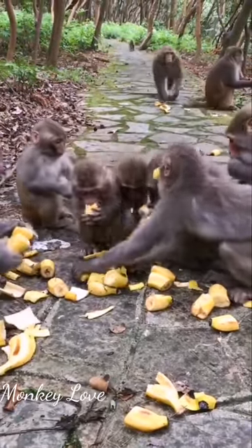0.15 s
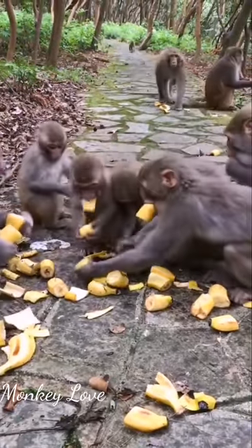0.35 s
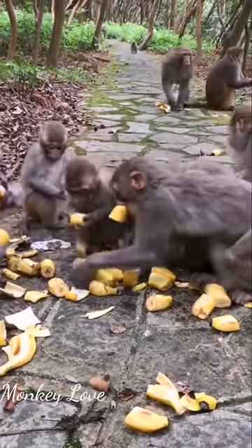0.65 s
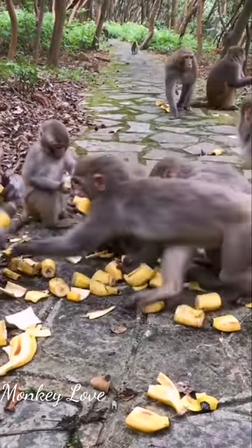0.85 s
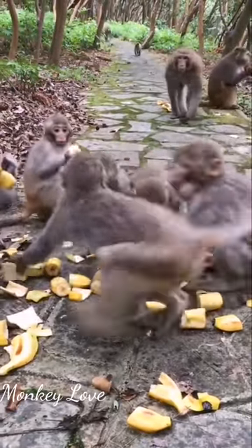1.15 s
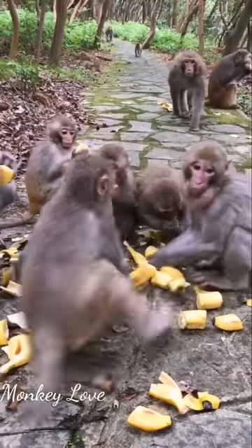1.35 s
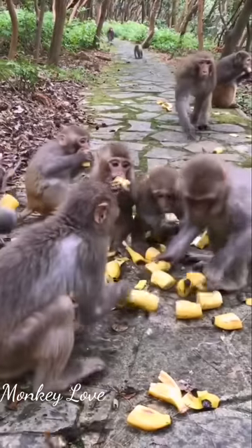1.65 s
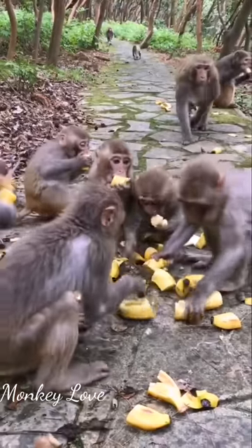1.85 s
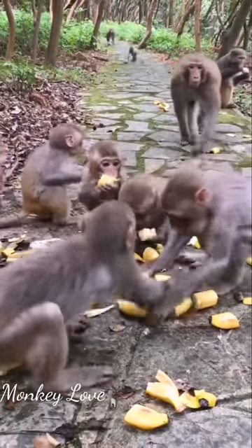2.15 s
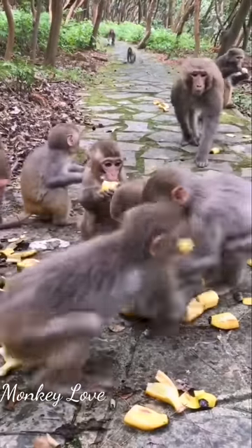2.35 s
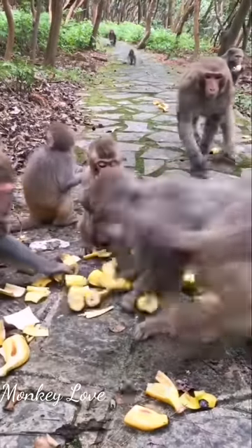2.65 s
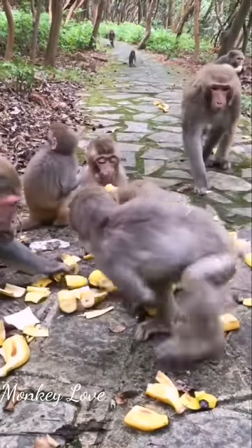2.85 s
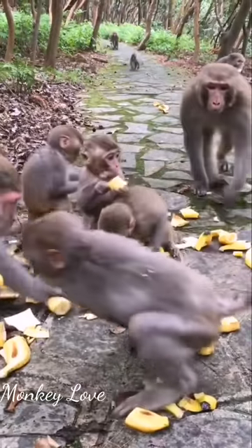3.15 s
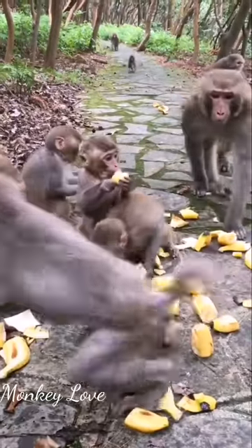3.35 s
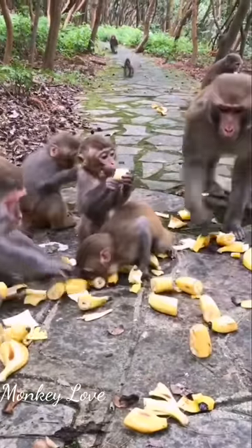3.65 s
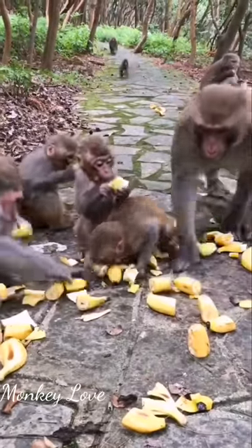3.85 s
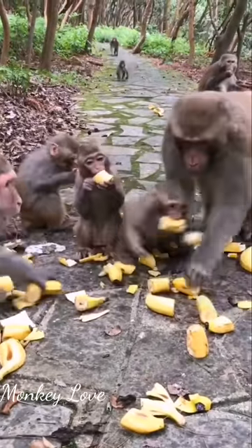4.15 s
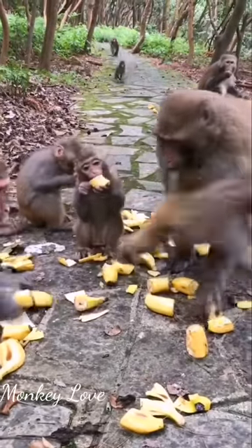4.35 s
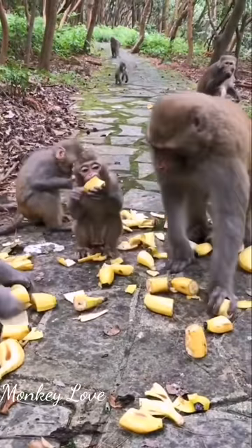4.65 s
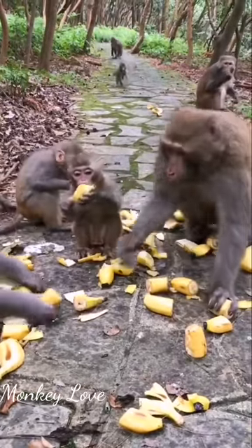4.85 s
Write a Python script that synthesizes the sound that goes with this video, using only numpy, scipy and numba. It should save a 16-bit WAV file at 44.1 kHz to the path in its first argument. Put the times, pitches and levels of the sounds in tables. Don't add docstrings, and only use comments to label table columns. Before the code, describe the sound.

Close scuffs, clicks and leafy rustle from feeding monkeys, broken by very short squeals and barks, over soft low forest rumble and distant idling.

```python
import sys
import numpy as np
from scipy import signal
from scipy.fft import rfft, irfft, next_fast_len
from scipy.io import wavfile
from scipy.ndimage import uniform_filter1d
from numba import njit

SR = 44100
rng = np.random.default_rng(int(sys.argv[2]) if len(sys.argv) > 2 else 0)


def voltage_ratio(level):
    return 10 ** (np.asarray(level, float) / 20)


def persist_wave(psi):
    counts = np.round(np.clip(psi, -1, 1) * 32767).astype(np.int16)
    wavfile.write(sys.argv[1], SR, np.atleast_2d(counts).T)


N = 221173

RASP_SHAPE = 0.24, .45, 9.8, 15


@njit
def svf(x, hz, width):
    y, b, l = np.empty(len(x)), 0., 0.
    for i in range(len(x)):
        g, k = np.tan(np.pi * hz[i] / SR), width / hz[i]
        v = (b + g * (x[i] - l)) / (1 + g * (g + k))
        b, l, y[i] = 2 * v - b, l + 2 * g * v, k * v
    return y


def band(x, hz, width):
    return svf(x, np.clip(hz + np.zeros(len(x)), 20, .44 * SR), 1. * width)


def band_twice(x, hz, width):
    return band(band(x, hz, width), hz, width)


def unit(x):
    return x / np.sqrt(np.mean(x ** 2))


def walk(rate, size=N):
    k = max(int(SR / rate), 1)
    steps = np.repeat(rng.standard_normal(size // k + 1), k)
    return 1.3 * uniform_filter1d(uniform_filter1d(steps, k), k)[:size]


def read(table):
    s, *columns = np.transpose(table)
    s = np.sort(s)
    at = np.arange(int(max(s[0], 0) * SR), min(int(s[-1] * SR), N))
    edges = np.clip(np.minimum(at - at[0], at[-1] - at) / (SR / 500), 0, 1)
    return at[0], [np.interp(at / SR, s, c) for c in columns], edges


def add(out, at, x):
    x = x[:len(out) - at]
    out[at:at + len(x)] += x


def call_shape(start, length, db, attack, hold, attack_db, release_db):
    share = np.clip([0, attack, attack + hold, 1], 0, 1)
    return start + min(length, .225) * share, share, db - np.array([attack_db, 0, 0, release_db])


def monkeys():
    out = np.zeros(N)
    for voice, calls in ((whistle, thin_calls()), (bark, harsh_calls())):
        for call in calls:
            at, curves, edges = read(call)
            add(out, at, edges * voice(*curves))
    add(out, *screech())
    add_wheezes(out)
    add(out, *coo())
    return out


def bark(hz, db, throat_hz, mouth_hz, hiss_db, muzzle_db):
    # (centre [Hz], width [Hz], level [dB])
    nasal = [(4500, 900, -8), (2100, 700, -6), (5800, 1400, -13), (7800, 1200, -15)]
    chance = rng.standard_normal((3, 4500))[:, :len(hz)]
    phase = np.cumsum(hz * np.exp(0.2 * walk(700, size=4500)[:len(hz)])) / SR
    slaps = np.diff(np.floor(phase), prepend=np.floor(phase[0])) * voltage_ratio(2 * chance[0])
    puffs = np.exp(-(phase % 1) / 0.51) * chance[1]
    source = unit(slaps) + .6 * unit(puffs)
    cavities = [(f, 420 + .08 * np.median(f), g) for f, g in ((throat_hz, 0), (mouth_hz, -1))]
    for f, width, g in nasal:
        silenced_db = 60 * np.log10(np.minimum(f / throat_hz, 1))
        cavities.append((f, width, g + muzzle_db * (f > 5000) + silenced_db))
    voice = sum((-1) ** k * voltage_ratio(g) * band_twice(source, f, w) for k, (f, w, g) in enumerate(cavities))
    low_cut = signal.butter(2, .5 * np.median(throat_hz), "high", fs=SR, output="sos")
    voice = signal.sosfilt(low_cut, voice)
    hiss = band_twice(puffs + .5 * chance[2], 10300, 14000)
    return voltage_ratio(db) * (unit(voice) + voltage_ratio(hiss_db) * unit(hiss))


def harsh_calls():
    # (time [s], fold slaps [Hz], level [dB], throat [Hz])
    shriek = [(.865, 898, -45, 2500), (.871, 794.5, -19.5, 2200), (.877, 1053, -19, 2300),
              (.886, 903, -24, 2300), (.895, 1001, -21, 3100), (0.903, 996, -25, 2900),
              (.918, 970, -44, 2400), (0.946, 897, -52, 2360)]
    # (time [s], fold slaps [Hz], level [dB], throat [Hz])
    long_bark = [(3.002, 700.3, -49, 1110), (3.01, 599, -30.5, 1030), (3.028, 499.3, -27.5, 1360),
                 (3.04, 480, -35.5, 1270), (3.055, 480, -47.5, 1000), (3.068, 483, -55, 1000)]
    low_bark = [(3.708, 1091, -49, 1500), (3.72, 1120, -32.5, 1250), (3.726, 900, -27.5, 1180),
                (3.74, 573, -31, 1060), (3.753, 560, -56, 1100)]
    falling_bark = [(4.285, 430, -40, 5600), (4.286, 410, -32, 5500), (4.292, 425, -33, 5200),
                    (4.305, 498.5, -27.5, 5116), (4.314, 602, -33.5, 4580), (4.329, 583, -37, 2520),
                    (4.358, 596, -56, 1800)]
    # (mouth above throat [Hz], air hiss at full voice [dB], upper muzzle [dB])
    mouths = [
        (1800, -34, 2),
        (1740, -17, -9),
        (1600, -24, -7),
        (1800, -18, -5),
    ]
    # (start [s], length [s], throat [Hz], fold slaps [Hz], level [dB])
    rasps = [(.886, 0.036, 9340, 940, -34), (0.972, 0.09, 6400, 900, -43), (2.27, 0.023, 8200, 470, -40),
             (2.995, .065, 7600, 600, -40), (2.985, .036, 9000, 1200, -37), (2.984, .03, 2400, 700, -36),
             (2.99, .04, 3200, 700, -36), (.922, .048, 5600, 900, -41), (1.0, .065, 11800, 790, -45),
             (3.758, .026, 1170, 686, -42)]
    barks = (shriek, long_bark, low_bark, falling_bark)
    calls = [(np.transpose(c), *m) for c, m in zip(barks, mouths)]
    for start, length, throat_hz, hz, db in rasps:
        s, _, level_db = call_shape(start, length, db, *RASP_SHAPE)
        curves = s, hz + 0 * s, level_db, throat_hz + 0 * s
        hiss_db = -5 + 8 * np.log2(throat_hz / 7000)
        calls.append((curves, 1700, hiss_db, -4))
    for (s, hz, db, throat_hz), above_hz, hiss_db, muzzle_db in calls:
        leak_db = .57 * (db.max() - db)
        yield np.transpose([s, hz, db, throat_hz, throat_hz + above_hz, hiss_db + leak_db,
                            muzzle_db + 0 * s])


def whistle(hz, db, octave_db, rough):
    pitch_shake, size_shake = (walk(r, size=10000)[:len(hz)] for r in (1500, 800))
    smooth_hz = uniform_filter1d(hz, 130, mode="nearest")
    phase = 2 * np.pi * np.cumsum(smooth_hz * (1 + .1 * rough * pitch_shake)) / SR
    tone = np.sin(phase) + voltage_ratio(octave_db) * np.sin(2 * phase)
    tone = tone + voltage_ratio(np.minimum(octave_db, 0) - 18) * np.sin(3 * phase)
    air = band(rng.standard_normal(10000)[:len(hz)], 1.2 * hz, 2500)
    shaken = voltage_ratio(11 * rough * np.clip(size_shake, -3, 1)) * tone
    return np.sqrt(2) * voltage_ratio(db) * (shaken + .5 * rough * unit(air))


def thin_calls():
    # (start [s], length [s], first pitch [Hz], last pitch [Hz], level [dB])
    squeaks = [(.943, .013, 5550, 6250, -29), (1.026, .013, 5750, 5450, -38),
               (2.296, .014, 2100, 1500, -46), (2.27, .018, 8100, 7850, -38),
               (2.105, .045, 9750, 9650, -44), (2.088, .018, 12500, 12300, -54),
               (2.29, .016, 8000, 8000, -47), (2.156, .014, 6350, 6300, -46),
               (2.122, .024, 7700, 7450, -41), (1.013, .022, 8550, 8700, -44),
               (1.054, .008, 3300, 2500, -46), (3.86, .014, 6750, 6650, -47),
               (.976, 0.017, 8050, 7950, -40), (1.042, .015, 4450, 3450, -32),
               (1.058, 0.012, 2500, 1750, -41), (2.045, .115, 10700, 9400, -52),
               (2.1, 0.038, 8300, 8100, -35.5), (2.105, .04, 6180, 6100, -41),
               (2.142, .014, 6100, 6300, -35), (2.088, .05, 13900, 13400, -54),
               (3.691, .022, 1420, 1700, -44), (3.812, .014, 4400, 4350, -43.5),
               (3.716, .032, 1190, 1110, -43), (3.842, .036, 4540, 4420, -41),
               (3.842, .036, 2270, 2210, -42), (4.313, .007, 3300, 2600, -34),
               (4.313, .015, 2500, 2380, -29), (4.325, 0.008, 1950, 1750, -37)]
    # (start [s], length [s], first [Hz], last [Hz], level [dB])
    shriek_notes = [(.851, .012, 2750, 3100, -27), (.852, .006, 5400, 6100, -30),
                    (.846, .007, 2000, 2700, -38), (.869, .008, 2700, 2500, -29),
                    (.868, .007, 2050, 2050, -27), (.855, .017, 6150, 6350, -18),
                    (.872, .014, 6350, 6000, -21), (.868, .012, 3500, 3950, -19),
                    (.878, .01, 4100, 4000, -22), (.879, .011, 2150, 2200, -21),
                    (.887, .013, 4950, 4950, -15), (.9, .014, 4960, 4900, -25),
                    (.888, .014, 4000, 4200, -21), (.903, .011, 3980, 4050, -25),
                    (.887, .016, 5900, 5800, -20), (.903, .016, 6100, 5780, -21),
                    (.904, .016, 2980, 2950, -30), (.93, .01, 4000, 4100, -40),
                    (.935, .01, 2380, 2380, -41)]
    # (start [s], length [s], first [Hz], last [Hz], level [dB])
    yelps = [
        (4.3075, 0.009, 3580, 3350, -25.5),
        (1.78, .025, 1420, 2350, -45),
        (2.268, 0.023, 4150, 3750, -38),
        (3.87, .018, 2350, 1310, -45),
    ]
    # (start [s], length [s], first [Hz], last [Hz], level [dB])
    chirps = [(.775, 0.019, 6800, 6640, -45.5), (1.032, .014, 4200, 4200, -46),
              (.95, .018, 6800, 6700, -39.5), (2.278, .015, 3900, 3100, -38),
              (2.235, 0.039, 7200, 6700, -50), (2.987, .011, 2400, 2400, -40),
              (3.002, .03, 3050, 2980, -41), (1.046, .014, 5100, 5000, -47), (1.072, .032, 2290, 2250, -51),
              (4.334, .026, 1720, 1600, -48)]
    # (start [s], length [s], first [Hz], last [Hz], level [dB])
    murmur = [
        (.46, .2, 295, 365, -59),
    ]
    # (time [s], pitch [Hz], level [dB])
    warble = [(2.03, 3800, -52), (2.046, 4300, -50), (2.052, 4500, -40), (2.065, 4700, -42),
              (2.104, 4270, -47)]
    # (time [s], pitch [Hz], level [dB])
    warble_end = [(2.104, 4200, -47), (2.112, 3860, -31), (2.145, 3856, -26), (2.153, 4450, -33),
                  (2.164, 4200, -41), (2.172, 4950, -39), (2.194, 6150, -45), (2.22, 6050, -45),
                  (2.233, 5100, -40), (2.248, 4830, -40)]
    kinds = ((squeaks, (-23, 0.2644, 0.37, 0.5, 12, 16.5)), (shriek_notes, (-24, .2, .25, .5, 7, 8)),
             (yelps, (-3.5, 0.31, 0.5, 1, 16, 10)), (chirps, (-15, .7, 0.1, .2, 7, 8)),
             (murmur, (-30, 0, .75, .1, 9, 12)))
    for rows, (octave_db, rough, *manner) in kinds:
        for start, length, first_hz, last_hz, db in rows:
            s, share, level_db = call_shape(start, length, db, *manner)
            hz = first_hz + (last_hz - first_hz) * share
            yield np.transpose([s, hz, level_db, octave_db + 0 * s, rough + 0 * s])
    for phrase in (warble, warble_end):
        s, hz, db = np.transpose(phrase)
        effort_db = db + 30
        yield np.transpose([s, hz, db, -19 - .15 * effort_db, .24 * voltage_ratio(.3 * effort_db)])


def screech():
    # (time [s], pitch [Hz], level [dB])
    course = [
        (.986, 915, -52),
        (.996, 920, -44),
        (1.012, 945, -41),
        (1.028, 966, -39),
        (1.04, 930, -48),
    ]
    # (multiple [-], level [dB])
    overtones = [(6, -3), (6.5, -7), (7, 0), (7.5, -6), (8, -1), (8.5, -8), (9, -3), (12, -12), (13, -10),
                 (14, -12)]
    at, (hz, db), edges = read(course)
    phase = 2 * np.pi * np.cumsum(hz * (1 + .006 * walk(250, size=len(hz)))) / SR
    tones = 0
    for k, g in overtones:
        tones = tones + voltage_ratio(g + 4 * walk(180, size=len(hz))) * np.sin(k * phase + k * k)
    return at, edges * voltage_ratio(db) * unit(tones)


def add_wheezes(out):
    # (start [s], length [s], centre [Hz], width [Hz], level [dB])
    wheezes = [(.876, .044, 15600, 600, -43), (.833, .04, 12200, 1500, -52), (.866, .05, 7200, 2000, -36),
               (.885, .022, 4800, 3500, -25), (.866, .022, 3800, 2500, -26), (.902, .018, 4800, 2500, -32),
               (2.148, .035, 4300, 1600, -43), (3.038, .014, 4800, 700, -47),
               (4.318, .036, 5000, 5000, -42), (2.272, .02, 9600, 1200, -46), (2.05, .03, 15300, 600, -55),
               (.95, .02, 6900, 1500, -38), (.887, .032, 13500, 3000, -43), (1.008, .032, 13000, 3500, -46),
               (3.002, .015, 3900, 1200, -37), (3.0, .025, 8300, 2500, -40),
               (3.818, .028, 12000, 9000, -44), (3.82, .022, 5000, 1500, -46),
               (3.704, .045, 6500, 3000, -43), (4.287, .03, 4500, 2500, -39), (4.33, .03, 1700, 1300, -48),
               (1.03, .045, 4000, 4000, -46), (2.282, .04, 3000, 3500, -46), (.925, .045, 3500, 4000, -48),
               (.973, .03, 6500, 3500, -46), (.93, .038, 12000, 1800, -48), (1.045, .018, 15400, 900, -48),
               (2.986, .03, 12500, 5000, -40), (2.986, .012, 3500, 3000, -36),
               (3.71, .03, 10800, 5000, -45), (4.287, .027, 11200, 1200, -48), (2.25, .022, 6600, 900, -50),
               (3.76, .022, 3000, 1100, -45), (3.797, .03, 12500, 2500, -57), (2.987, .014, 1500, 700, -44),
               (2.987, .03, 6500, 800, -43), (3.71, .035, 2500, 2500, -42)]
    for start, length, hz, width, db in wheezes:
        s, _, level_db = call_shape(start, length, db, *RASP_SHAPE)
        at, (level_db,), edges = read(np.transpose([s, level_db]))
        air = rng.standard_normal(3000)[:len(edges)]
        add(out, at, edges * voltage_ratio(level_db) * unit(band_twice(air, hz, width)))


def coo():
    # (time [s], pitch [Hz], level [dB])
    course = [
        (.6, 678, -72),
        (.69, 677, -48),
        (.8, 690, -41),
        (.874, 684, -44.5),
        (1.12, 683, -47),
        (1.2, 659, -44),
        (1.26, 642, -54),
        (1.31, 633, -72),
    ]
    open_s, after_slope, before_slope, rest_db = .76, 260, 300, -6
    tired_s, shake_hz, shake_db = 1.125, 19.29, 8
    at, (hz, db), _ = read(course)
    t = (at + np.arange(len(hz))) / SR
    opening_db = -np.maximum(after_slope * (t - open_s), before_slope * (open_s - t))
    octave_db = np.maximum(opening_db, rest_db - 70 * np.abs(t - .89)) + 1.5 * walk(30, size=len(t))
    quaver = np.cos(2 * np.pi * shake_hz * (t - tired_s)) * np.clip((t - tired_s) * shake_hz, 0, 1)
    level = voltage_ratio(db - shake_db * quaver + 1.2 * walk(26.2)[:len(hz)])
    phase = 2 * np.pi * np.cumsum(hz * (1 + .0015 * walk(40)[:len(hz)])) / SR
    return at, np.sqrt(2) * level * (np.sin(phase) + voltage_ratio(octave_db) * np.sin(2 * phase))


def grit(spread_db):
    sizes = np.minimum(rng.exponential(size=N // 8 + 1), 5)
    return unit(rng.standard_normal(N) * voltage_ratio(spread_db * np.repeat(sizes, 8)[:N]))


def ground():
    # (time [s], peak [dB], centre [Hz], time to the peak [s])
    scuffs = [(0.145, -36.5, 3750, 0.005), (0.267, -43.5, 2480, 0.0038), (0.3233, -36.5, 4770, 0.0063),
              (0.46, -39, 10700, 0.0062), (0.6896, -38.5, 2700, 0.005), (0.7786, -44, 6790, 0.012),
              (1.0969, -47, 6480, 0.0071), (1.2466, -31, 5380, 0.0066), (1.7175, -35, 5700, 0.0053),
              (1.89, -26.5, 2750, 0.011), (2.245, -38, 3600, 0.02), (2.4835, -41, 3310, 0.004),
              (2.703, -37, 4170, 0.0036), (2.8115, -39, 3160, 0.0046), (3.2284, -35.5, 8500, 0.0052),
              (3.35, -45, 4460, 0.0061), (3.8234, -27, 5460, 0.012), (4.063, -36.5, 4400, 0.0056),
              (4.244, -35.5, 3860, 0.015), (4.371, -38, 8950, 0.0045), (4.5151, -45, 3490, 0.04),
              (4.789, -29, 4000, 0.0089), (5, -42, 3900, 0.0051)]
    # (time [s], peak [dB], centre [Hz])
    cracks = [(1.6035, -13, 5200), (1.6045, -13, 12000), (1.606, -12, 4200), (1.607, -8, 4600),
              (1.6075, -13, 12000), (1.626, -30, 3000), (0.3262, -26, 5000), (1.098, -30, 5500),
              (0.151, -28.5, 5050), (0.271, -35, 7000), (.4618, -29, 9000), (2.9875, -24, 7000),
              (4.376, -34, 12000), (4.518, -34, 12000), (4.2855, -20, 7500), (.946, -27, 6500),
              (.8945, -11, 6500), (.881, -16, 5500), (3.0268, -22, 2500), (4.2885, -27, 5500),
              (4.2905, -26, 5500), (4.298, -23, 5500), (4.3005, -24, 5500), (4.3085, -24, 6000),
              (3.763, -33, 3500), (3.694, -32, 4500), (.835, -34, 3500), (1.894, -28, 3500),
              (4.596, -32, 7000), (4.722, -35, 9000), (4.879, -33, 5500)]
    # (time [s], peak [dB], centre [Hz])
    ticks = [(0.0464, -41, 5010), (0.0942, -42, 6840), (0.1244, -36, 3750), (0.1744, -46, 4150),
             (0.3644, -39, 4130), (0.5871, -39, 5310), (1.1388, -35, 11600), (2.5794, -38, 5590),
             (2.6064, -37, 7900), (2.6833, -37, 4230), (2.7194, -39, 3760), (2.7706, -43, 3580),
             (2.7926, -41, 3820), (2.8135, -33, 4080), (2.8734, -39, 5130), (2.9512, -40, 3700),
             (3.2106, -34, 4130), (3.3493, -41, 4460), (3.4166, -39, 5560), (3.5199, -42, 4450),
             (3.676, -40, 4500), (3.9094, -33, 11700), (4.143, -33, 3810), (4.5694, -37, 4250),
             (4.8024, -25, 3630), (4.8544, -36, 3850), (4.9244, -40, 10900), (5.0015, -30, 3900)]
    # (time [s], pitch [Hz], level [dB], 60 dB decay [s])
    thumps = [(.942, 260, -32, .08), (1.002, 133, -24, .14), (3.726, 560, -33, .1), (3.018, 320, -38, .1),
              (3.018, 600, -36, .1), (3.01, 1000, -37, .14), (3.015, 430, -42, .1), (3.725, 440, -41, .08),
              (1.112, 380, -45, .07), (.945, 190, -36, .07), (.945, 350, -38, .06), (2.29, 300, -43, .08)]
    out, t, grains = np.zeros(N), np.arange(4000) / SR, grit(1.8)
    for s, db, hz, rise_s in scuffs:
        swell = np.e * t / rise_s * np.exp(-t / rise_s)
        burst = np.resize(grains[int(s * SR):], len(t))
        add(out, int(s * SR), voltage_ratio(db - 9) * swell * unit(band(burst, hz, 1.1 * hz) + .2 * burst))
    for s, db, hz in cracks + [(s, db - 3, hz) for s, db, hz in ticks]:
        snap = rng.standard_normal(len(t)) * (np.exp(-t / 0.00017) + 0.045 * np.exp(-t / 0.011))
        snap = band_twice(snap, hz, 2.2 * hz)
        snap = snap_edge(snap)
        add(out, int(s * SR), voltage_ratio(db) * snap / np.abs(snap).max())
    for s, hz, db, t60 in thumps:
        decay = voltage_ratio(db - 60 * t / t60) * (1 - np.exp(-t / .005))
        add(out, int(s * SR), decay * np.sin(2 * np.pi * hz * t))
    return out


def rustle():
    # (time [s], level [dB])
    bustle = [(0, -62), (.4, -61), (.82, -54.5), (1.2, -52.5), (1.27, -48), (1.55, -46), (1.66, -49.5),
              (2.02, -49), (2.3, -51), (2.38, -57.5), (3.12, -62), (3.3, -60), (3.79, -63.5), (3.89, -55),
              (4.25, -52.5), (4.42, -56.5), (4.6, -55.5), (5.02, -56)]
    # (middle [s], half length [s], level [dB], treble over level [dB], low over level [dB])
    drags = [(0.573, .05, -60.5, -9, 4.5), (1.31, 0.064, -48, 3.5, 0.5), (1.537, .05, -47.5, -7, 1.5),
             (1.776, 0.054, -60, 11, -1), (1.96, 0.051, -41.5, -12, -6), (2.206, 0.03, -59, -22, -14),
             (2.583, 0.069, -58, 7, -5), (3.244, .025, -49, 2.5, -12), (3.407, 0.025, -55.5, 4, -12),
             (3.533, 0.035, -62, 3.5, 6.5), (3.87, 0.058, -48.5, 4.5, -7), (1.5, .04, -56, -10, 8),
             (2.82, .03, -60, 3, -8), (.69, .02, -58, 5, -8), (.38, .05, -63, 4, -6),
             (4.6, 0.083, -57, 5.5, -3), (4.862, 0.12, -66, 11, 0)]
    t = np.arange(N) / SR
    busy_db = -51
    over_db = np.interp(t, *np.transpose(bustle)) - busy_db
    power = voltage_ratio(2 * (busy_db + np.outer([1, 0.86, 1.74], over_db) + [[0], [-1.5], [-7]]))
    for s, half, db, treble_db, low_db in drags:
        swell = np.exp(-2 * ((t - s) / half) ** 2)
        power = power + np.outer(voltage_ratio(2 * (db + np.array([0, treble_db, low_db]))), swell)
    grains, flicker_db = grit(2.2), .8 * walk(14) + 1.4 * walk(50)
    ranges = ((3000, 8340, 2.5), (9750, 23700, -0.8), (510, 2650, 2))
    out = np.zeros(N)
    for (hz, width, db), p in zip(ranges, power):
        out += unit(band_twice(grains, hz, width)) * voltage_ratio(db + flicker_db) * np.sqrt(p)
    return out


def engine():
    # (multiple of the firing rate [-], level [dB], wander [dB])
    multiples = [(3, -56, 3.5), (4, -56, 3.5), (5, -48.5, 1.5), (6, -55, 2), (7, -60, 2), (8, -67, 2),
                 (9, -66, 2), (11, -70, 2), (12, -71, 2), (13, -71, 2)]
    # (time [s], level [dB])
    deep_swell = [(0, 4), (.25, 0), (.55, 4), (1.3, 2), (1.6, -4), (1.9, 3), (2.4, 1), (3.5, 0), (4.0, -1),
                  (4.4, -3), (4.75, -3), (5.0, 2)]
    firing_hz, lead = 25.47, .43
    deep_db, beat_hz, depth, silence_s = -47.5, 1.64, .85, .47
    t = np.arange(N) / SR
    phase = 2 * np.pi * np.cumsum(firing_hz * (1 + .0012 * walk(2))) / SR
    lag = 2 * np.pi * beat_hz * (t - silence_s)
    deep = voltage_ratio(deep_db + np.interp(t, *np.transpose(deep_swell)) + walk(6))
    deep = deep * (np.sin(2 * phase) - depth * np.sin(2 * phase - lag))
    pushes = np.zeros(N)
    for k, db, wander_db in multiples:
        pushes += voltage_ratio(db + wander_db * walk(5)) * np.cos(k * (phase + 2 * np.pi * lead))
    return np.sqrt(2) * (deep - pushes)


def boom():
    return voltage_ratio(-54) * unit(band_twice(rng.standard_normal(N), 54, 18))


def wood():
    # (frequency [Hz], level per Hz [dB])
    spectrum = [(15, -46), (25, 2), (53, -1.5), (91, -1.5), (130, -8), (200, -10), (437, -22),
                (1180, -17.5), (1390, -21), (2970, -26.5), (4690, -33), (5520, -27), (7220, -42.5),
                (12100, -63), (15800, -55)]
    hz, db = np.transpose(spectrum)
    size = next_fast_len(N)
    bins_hz = np.arange(1, size // 2 + 2) * SR / size
    colour = voltage_ratio(np.interp(np.log(bins_hz), np.log(hz), db, left=-80))
    return voltage_ratio(-48) * unit(irfft(rfft(rng.standard_normal(size)) * colour, size)[:N])


def snap_edge(snap):
    return snap + 0.025 * np.diff(snap, prepend=0)


def echo(near):
    t = np.arange(SR // 4) / SR
    tail = rng.standard_normal(len(t)) * voltage_ratio(-60 * t / .2) * (t > .004)
    return voltage_ratio(-24) * signal.fftconvolve(near, tail / np.sqrt(np.sum(tail ** 2)))[:N]


def scene():
    near = monkeys() + ground()
    return (near + echo(near) + rustle() + engine() + boom() + wood())[None]


def band_limit(x):
    return signal.sosfilt(signal.butter(12, 15850, fs=SR, output="sos"), x)


def record(dry):
    cut = signal.sosfilt(signal.butter(4, 38, "high", fs=SR, output="sos"), dry)
    cut = signal.sosfilt(signal.ellip(8, .2, 70, 15850, fs=SR, output="sos"), cut)
    dip, bump = band(cut[0], 9700, 1500), band(cut[0], 11500, 2000)
    return band_limit(cut - .3 * dip + .25 * bump)


dry = scene()
out = record(dry)
persist_wave(out)
```